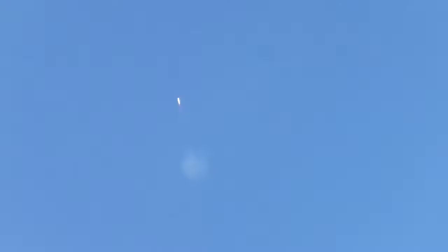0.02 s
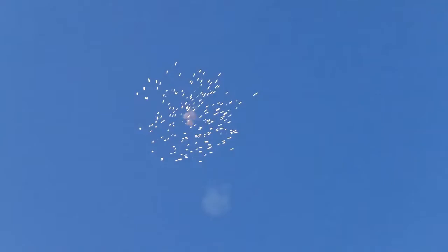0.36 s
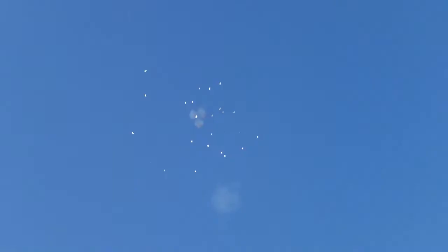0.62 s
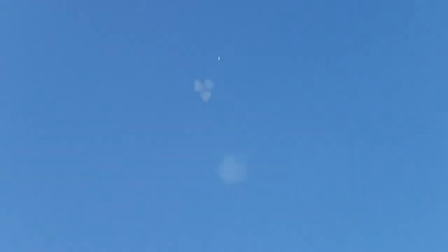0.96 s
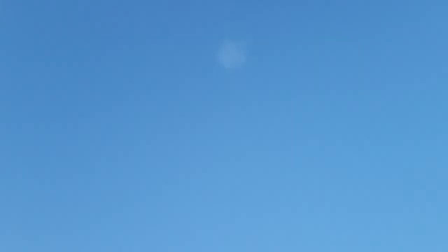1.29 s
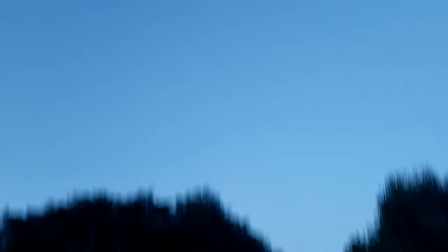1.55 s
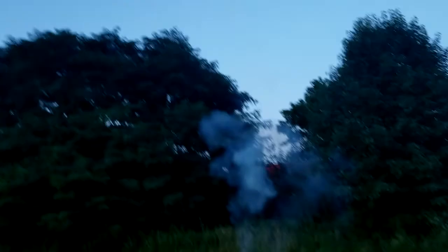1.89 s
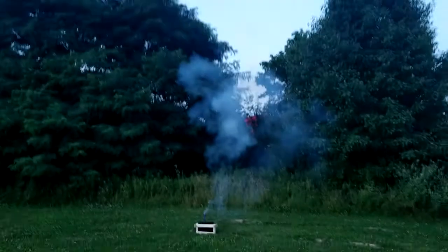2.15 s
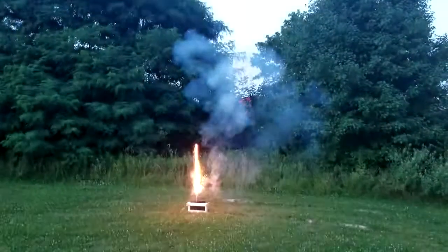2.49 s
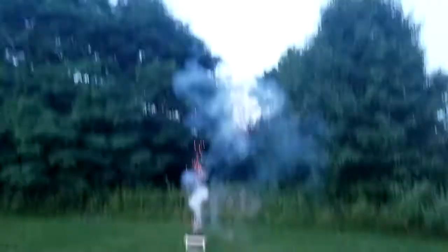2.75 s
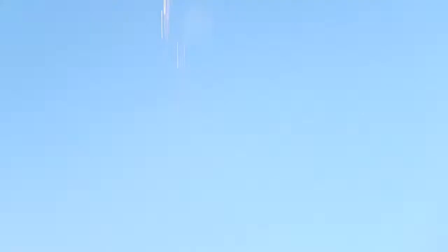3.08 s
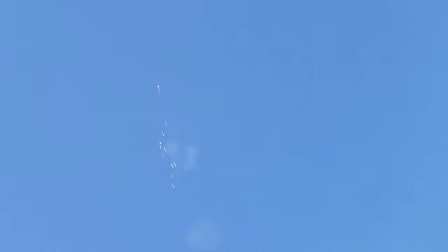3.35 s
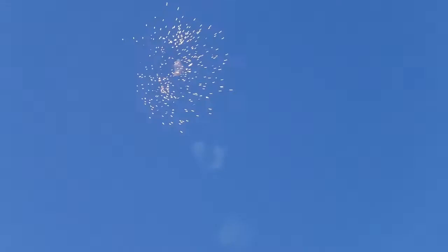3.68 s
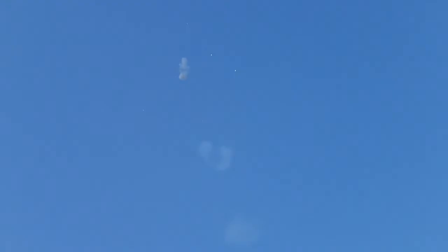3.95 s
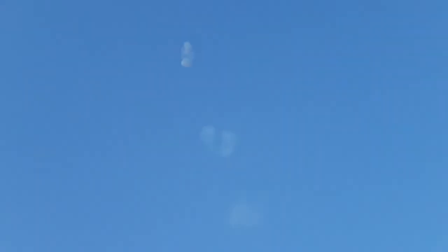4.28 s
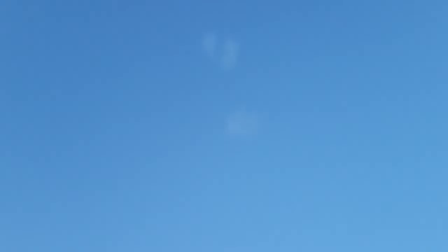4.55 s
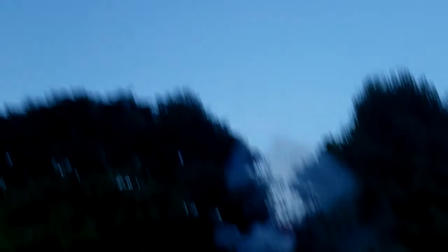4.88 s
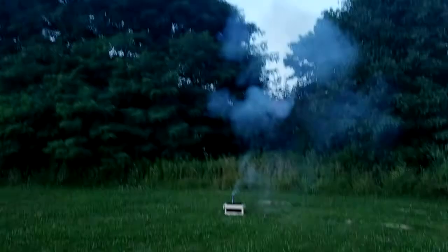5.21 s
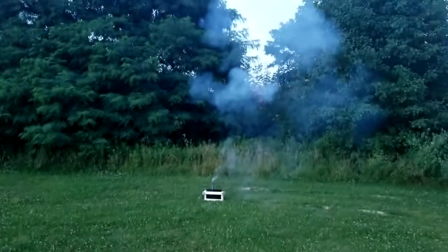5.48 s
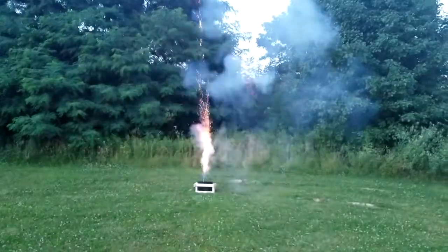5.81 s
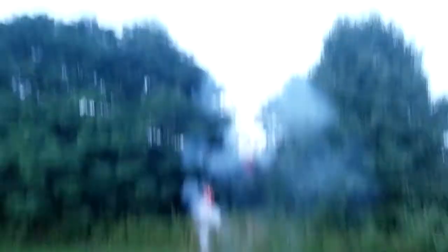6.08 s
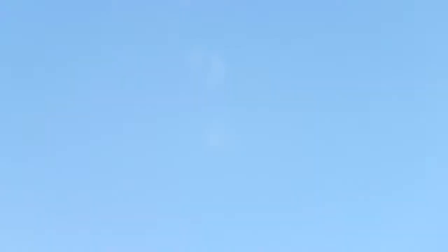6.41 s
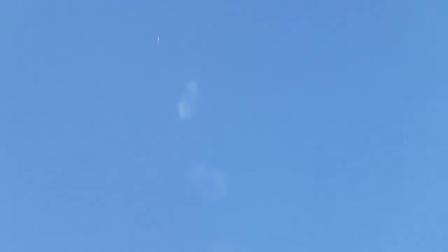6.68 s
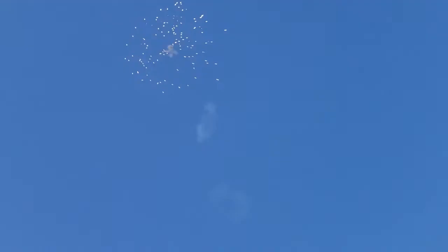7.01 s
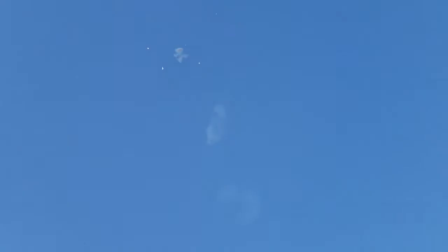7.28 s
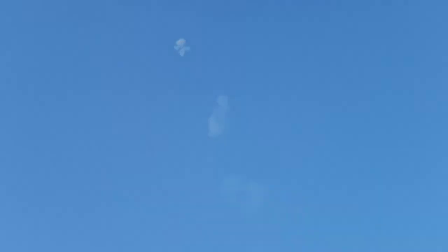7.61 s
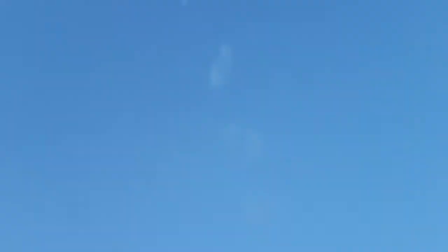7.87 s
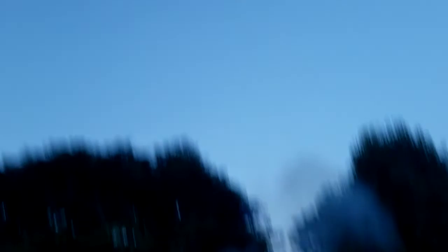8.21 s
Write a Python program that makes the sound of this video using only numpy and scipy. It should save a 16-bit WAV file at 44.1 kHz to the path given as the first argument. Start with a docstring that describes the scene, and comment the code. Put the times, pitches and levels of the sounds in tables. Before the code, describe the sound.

On a lawn ringed by trees, three loud firework bangs come about three seconds apart, the first right away. A hollow launch pop and a faint fizzing hiss lead into the second and third. Each bang distorts the microphone and leaves dull slapping echoes and a long, darkening roll. Underneath are a low, far-off engine hum, soft outdoor air, and occasional faint knocks and ticks.

```python
"""Firework shells burst one after another over a lawn ringed by trees, each bang overloading the mic.
A shell leaves its tube with a hollow pop and a short hiss, then fizzes upward on its fuse.
The near trees throw back a bright splash, far surfaces a dull slap and the woods a long roll.
Underneath, an engine hums far off in the dusk air, with dull knocks and the firework's faint ticks."""
import sys
import numpy as np
from scipy import signal
from scipy.fft import rfft, irfft
from scipy.io import wavfile

SR = 44100
rng = np.random.default_rng(int(sys.argv[2]) if len(sys.argv) > 2 else 0)


def waveform_to_disk(signal):
    """Save audio, clipped to [-1, 1], as 16-bit WAV at the path in sys.argv[1]."""
    frames = np.transpose(np.atleast_2d(signal))
    scaled = np.clip(frames, -1, 1) * 32767
    samples = np.round(scaled).astype(np.int16)
    wavfile.write(sys.argv[1], SR, samples)


N = 363825
TIME = np.arange(N) / SR


def from_db(db):
    """Decibels to gain."""
    return np.exp(np.asarray(db) * np.log(10) / 20)


def at_hz(points, hz):
    """Every column of a spectrum table, read at hz on a log frequency axis."""
    freqs, *columns = np.transpose(points)
    return [np.interp(np.log(hz), np.log(freqs), column) for column in columns]


def cut(x, hz, kind, order=2):
    """Causal Butterworth filter."""
    sos = signal.butter(order, np.clip(hz, 10, SR / 2 - 500), kind, fs=SR, output="sos")
    return signal.sosfilt(sos, x + 1e-18)


def drift(rate):
    """Random modulator that glides to a new unit-normal value rate times a second."""
    knots = rng.standard_normal(4096)
    return np.interp(TIME * rate, np.arange(len(knots)), knots)


def add(out, s, sound):
    """Mix a sound in at s seconds."""
    i = int(round(s * SR))
    out[i:i + len(sound)] += sound[:N - i]


def since(shots):
    """Age of the latest shot (10 s before the first) and that shot's columns, at every sample."""
    rows = np.array(shots)
    latest = np.searchsorted(rows[:, 0], TIME) - 1
    return np.where(latest < 0, 10, TIME - rows[latest, 0]), rows[latest].T


def noise_bands():
    """Half-octave bands of noise at rms 1, as (centre f/Hz, samples)."""
    edges = 31.25 * 2 ** np.arange(0, 9.1, .5)
    white = rng.standard_normal((2, N + SR // 2))
    for k, (low, high) in enumerate(zip(edges, edges[1:])):
        band = cut(white[k % 2], [low, high], "band")[-N:]
        yield np.sqrt(low * high), band / band.std()


def steady_noise(spectrum):
    """Noise through an EQ curve, at rms 1."""
    hz = np.maximum(np.arange(N // 2 + 1) * SR / N, 1)
    eq = from_db(at_hz(spectrum, hz)[0])
    noise = cut(irfft(rfft(rng.standard_normal(N)) * eq, N), 25, "high")
    return noise / noise.std()


# EQ of the evening air: f/Hz, relative level/dB
AIR_EQ = [(35, -1.5), (55, 6), (100, -1), (160, -5), (260, -11), (450, -7.5), (800, -16.5), (1500, -20),
          (1850, -27), (2250, -42), (3000, -36), (4000, -52.5), (4700, -41.5), (5800, -54.5), (7200, -51.5),
          (9000, -61), (12500, -66.5), (15000, -85.5)]


def air(level_db=-45):
    """Evening air lays a soft, dark bed under the scene."""
    return from_db(level_db) * steady_noise(AIR_EQ)


# fader ride of the far engine: t/s, level/dB
ENGINE_RIDE = [(0, -40), (1.2, -45), (2.2, -45.5), (2.9, -37.5), (3.4, -38.5), (4.6, -46), (5.4, -50.5),
               (6.4, -43.5), (8.25, -50.5)]
# partials of its hum: f/Hz, relative level/dB
ENGINE_PARTIALS = [(80, -4.5), (112, -3.5), (161.5, -17.5), (193.8, -14)]


def engine():
    """A few low partials waver on their way over the fields."""
    hum, speed = 0, 1 + .005 * drift(2.5)
    for hz, level_db in ENGINE_PARTIALS:
        phase = 2 * np.pi * np.cumsum(hz * speed) / SR
        hum = hum + np.sqrt(2) * from_db(level_db + 0.75 * drift(4.8)) * np.sin(phase)
    return hum * from_db(np.interp(TIME, *np.transpose(ENGINE_RIDE)))


# dull knocks: t/s, peak level/dB, f/Hz
DULL_KNOCKS = [(3.114, -34, 1080), (3.183, -25.5, 426), (3.198, -32, 433), (6.431, -35.5, 930),
               (6.496, -27, 416), (6.512, -29.5, 420)]
# small, bright ticks and spits from the smouldering firework: t/s, peak level/dB, f/Hz
FAINT_TICKS = [(1.178, -60, 10000), (1.27, -60, 11000), (1.525, -51, 4570), (2.828, -49, 8200),
               (4.843, -53, 4000), (6.19, -60, 12000), (8.01, -49, 4850), (8.2, -49, 4800)]


def taps(rows, t60, spread):
    """Each knock or tick is a brief puff of noise in a broad resonance."""
    out, t = np.zeros(N), TIME[:SR // 10]
    for s, level_db, hz in rows:
        puff = rng.standard_normal(len(t)) * from_db(-60 * t / t60)
        tap = cut(puff, [hz / (1 + spread), hz * (1 + spread)], "band", order=3)
        add(out, s, from_db(level_db) * tap / np.abs(tap).max())
    return out


# slapback off walls and tree lines: delay/s, peak level/dB, share of the shell's drift added to the delay
SLAPBACKS = [(0.03, -5.5, -0.026), (.103, -7.5, 1), (.279, -12, 1), (0.303, -12, -.25), (.54, -18, -1.5),
             (.647, -17.5, -.6)]


def far_echoes():
    """Each rough, distant surface slaps every bang back as a short, dull clump."""
    out, t = np.zeros(N), TIME[:SR // 6]
    for s, *_, drift_s in BURST_CUES:
        for delay_s, level_db, share in SLAPBACKS:
            facets = rng.standard_normal(len(t)) * np.exp(-t / .01)
            clump = cut(cut(facets, [260, 800], "band", order=1), 1500, "low")
            add(out, s + delay_s + share * drift_s, from_db(level_db) * clump / np.abs(clump).max())
    return out


def lawn_scatter(age, level_db, fade_db_per_s=451):
    """Envelope of the scatter off the grass: instant attack at age 0, fast decay."""
    return (age >= 0) * from_db(level_db - fade_db_per_s * np.clip(age, 0, 1))


# stands of trees, near to far: burst delay/s, burst level/dB, launch delay/s, launch level/dB
TREE_STANDS = [(0.042, 6, .036, 2.5), (.098, 5, 0.12, -12.5), (.24, -7.5, .27, -26),
               (.55, -20, .475, -34.5)]


def stand_scatter(age, columns, fade_db_per_s, swell_db_per_s=698, smear_s=0.21):
    """Envelope of the stands' returns: each swells and dies away, more slowly from deeper woods."""
    power = 0
    for delay_s, level_db in np.array(TREE_STANDS)[:, columns]:
        past_peak = (age - delay_s) / (1 + delay_s / smear_s)
        drop_db = np.maximum(-swell_db_per_s * past_peak, fade_db_per_s * past_peak)
        power = power + from_db(level_db - np.clip(drop_db, 0, 200)) ** 2
    return np.sqrt(power)


# EQ of the near splash, for a burst and for a launch: f/Hz, level/dB per half octave
BURST_SPLASH_EQ = [(40, -44), (85, -23), (180, -30), (400, -21.5), (700, -23), (900, -32), (1400, -19),
                   (2500, -28.5), (3700, -21), (6000, -29.5), (9000, -30), (14000, -31)]
LAUNCH_SPLASH_EQ = [(40, -33.5), (90, -61), (180, -42.5), (320, -41.5), (650, -42.5), (1400, -44.5),
                    (3300, -35.5), (5500, -35), (9000, -42), (14000, -44.5)]
# reverb tail of the woods, per half octave: f/Hz, burst level/dB, launch level/dB, t60/s
WOODS_ROLL = [(40, -37, -55, 0.82), (82, -37.5, -47, 4.8), (176, -28, -45.5, 2.73), (310, -25, -51, 2.92),
              (516, -19.5, -53, 3.21), (880, -30, -58, 2.93), (1314, -23, -36.5, 2.64),
              (2460, -29.5, -42, 1.72), (4000, -30, -45, 2.12), (7000, -24, -45, 0.97),
              (9000, -30.5, -52.5, 0.57), (14000, -37, -56, 1.8)]
FOLIAGE_LOSS_DB = 16   # at 10 kHz, one second after a burst


def trees():
    """Grass, leaves and trunks scatter every shot: a bright splash, then a roll that loses its treble."""
    burst_age, (_, _, bounce_s, burst_splash_db, burst_roll_db, _) = since(BURST_CUES)
    burst_stands = stand_scatter(burst_age, columns=[0, 1], fade_db_per_s=261.5)
    burst_lawn = lawn_scatter(burst_age - bounce_s, level_db=-1.5)
    burst_splash = np.hypot(burst_stands, burst_lawn) * from_db(burst_splash_db)
    burst_roll = np.minimum(burst_age / 0.046, 1) * from_db(burst_roll_db)

    launch_age, (_, _, launch_splash_db, launch_roll_db) = since(LAUNCH_CUES)
    launch_stands = stand_scatter(launch_age, columns=[2, 3], fade_db_per_s=312.5)
    launch_lawn = lawn_scatter(launch_age, level_db=-4.5)
    launch_splash = np.hypot(launch_stands, launch_lawn) * from_db(launch_splash_db)
    launch_roll = np.minimum(launch_age / 0.087, 1) * from_db(launch_roll_db)

    out, clumps = 0, drift(30)
    for hz, noise in noise_bands():
        burst_db, launch_db, t60 = at_hz(WOODS_ROLL, hz)
        # late returns have crossed so much foliage that their top is gone
        foliage_db = -FOLIAGE_LOSS_DB * (burst_age * hz / 10000) ** 2
        paths = [burst_splash * from_db(at_hz(BURST_SPLASH_EQ, hz)[0] + foliage_db),
                 launch_splash * from_db(at_hz(LAUNCH_SPLASH_EQ, hz)[0]),
                 burst_roll * from_db(burst_db + foliage_db - 60 * burst_age / t60),
                 launch_roll * from_db(launch_db - 60 * launch_age / t60)]
        envelope = np.sqrt(sum(path ** 2 for path in paths))   # unrelated paths add in power
        # a few big trunks make the low end lumpy, countless leaves keep the top smooth
        lumpy_db = .6 + 1 / (1 + hz / 1500)
        out = out + noise * envelope * from_db(lumpy_db * (clumps + 0.42 * drift(60)))
    return out


# EQ of the burning fuse: f/Hz, relative level/dB
FUSE_EQ = [(60, 0.5), (180, 3.5), (280, 0), (450, -4), (800, -9.5), (1600, -14), (2400, -31.5),
           (3300, -34.5), (5200, -29.5), (8500, -39), (13000, -40.5), (15500, -44.5)]
FUSE_DB, FUSE_FLARE_S, FUSE_FADE_DB_PER_S = -43.5, .28, 6.5


def fuses(head_start_s=0.75):
    """A fuse flares, sputters and fades as it climbs to the burst; the first shell starts aloft."""
    flight_s = np.where(TIME < BURST_CUES[0][0], TIME + head_start_s, since(LAUNCH_CUES)[0])
    burning = flight_s < since(BURST_CUES)[0]
    envelope = np.minimum(flight_s / FUSE_FLARE_S, 1) * from_db(FUSE_DB - FUSE_FADE_DB_PER_S * flight_s)
    sputter = from_db(1.6 * drift(45) + 1.2 * drift(21))
    return burning * envelope * sputter * steady_noise(FUSE_EQ)


# hiss after each launch, a band near 5.6 kHz and a faint, thin one near 13 kHz:
# f/Hz, half width/Hz, level/dB
HISS_BANDS = [(5600, 1400, -56.5), (13400, 900, -71)]


def launch_hiss(hold_s=0.31, fade_db_per_s=67):
    """A flickering hiss follows each launch, holds and dies down."""
    hiss = 0
    for hz, half_width_hz, level_db in HISS_BANDS:
        band = cut(rng.standard_normal(N), [hz - half_width_hz, hz + half_width_hz], "band")
        hiss = hiss + from_db(level_db) * band / band.std()
    release_s = np.clip(since(LAUNCH_CUES)[0] - hold_s, 0, 3)
    return hiss * from_db(2.3 * drift(15) - fade_db_per_s * release_s)


def blast(push_s, suck_s, decay_s):
    """Pressure pulse of a charge: a shock front, a suction phase, then a slow swing back."""
    t = TIME[:SR // 16]
    return -(1 - t / push_s) * (1 - t / (push_s + suck_s)) * np.exp(-t / decay_s)


# launch cues: t/s, pop gain/dB, splash send/dB, roll send/dB
LAUNCH_CUES = [(2.354, -10, 4.5, -3), (5.5827, -10, 5.5, -2.5)]
# ring of the tube and its box: f/Hz, relative level/dB, t60/s
TUBE_MODES = [(71, -31, 0.085), (123.5, -3, 0.035), (163, -5.5, .055), (215, 4.5, 0.035),
              (280, -3.5, 0.045), (523, -3.5, 0.019), (840, 0.5, 0.014), (1316, 17, 0.0083),
              (1548, -14, 0.068), (3227, 11.5, 0.0057), (4740, 7, 0.007)]
# early reflections off near trunks: delay/s, level/dB
TRUNK_ECHOES = [(0.0107, -18), (.024, -27), (.037, -19.5)]


def launches(wall_delay_s=.0872):
    """The lift charge cracks and rings the tube; trunks return it faintly, a wall adds a duller copy."""
    out, t = np.zeros(N), TIME[:SR // 8]
    for s, level_db, _, _ in LAUNCH_CUES:
        add(out, s, from_db(level_db + 3) * blast(push_s=0.0026, suck_s=0.0061, decay_s=0.0017))
        for hz, mode_db, t60 in TUBE_MODES:
            pitch = hz * (1 + .02 * rng.standard_normal())
            add(out, s, from_db(level_db + mode_db - 60 * t / t60) * np.sin(2 * np.pi * pitch * t))
    wall_echo = from_db(-10.5) * cut(out, 540, "low", order=1)
    dulled_pops = cut(out, 2500, "low")
    for delay_s, level_db in TRUNK_ECHOES:
        add(out, delay_s, from_db(level_db) * dulled_pops)
    add(out, wall_delay_s, cut(wall_echo, 5000, "low"))
    return out


# burst cues: t/s, level/dB before overload, ground bounce delay/s, splash send/dB, roll send/dB,
# drift/s (the shell's distance off the line of fire, as sound travel time)
BURST_CUES = [(0.139, 36, 0.012, -2, 1.5, -0.015), (3.4645, 34, 0.011, -3, 1, 0.019),
              (6.7659, 27.5, 0.012, -4.5, 1, 0)]


def bursts():
    """Each shell's blast hits straight from the sky, then again, softer and darker, off the lawn."""
    out = np.zeros(N)
    direct = blast(push_s=.00045, suck_s=0.001, decay_s=.0015)
    bounce = cut(blast(push_s=0.00049, suck_s=0.0022, decay_s=0.001), 2500, "low", order=1)
    for s, level_db, bounce_s, *_ in BURST_CUES:
        add(out, s, from_db(level_db) * direct)
        add(out, s + bounce_s, from_db(level_db - 9.5) * bounce)
    return out


def scene():
    """The firework, its echoes, the knocks and ticks and the bed, mixed to dual mono."""
    firework = bursts() + launches() + launch_hiss() + fuses()
    small = taps(DULL_KNOCKS, t60=0.019, spread=0.37) + taps(FAINT_TICKS, t60=.04, spread=0.2)
    bed = air() + engine()
    mix = firework + trees() + far_echoes() + small + bed
    return np.array([mix, mix])


CLIP_LEVEL, PAN_DB, CUTOFF_HZ = 0.65, 1.57, 15750


def record(dry):
    """The mic saturates and its bass cuts make the flat tops droop; panned a little right, top cut off."""
    clipped = dry / (1 + (dry / CLIP_LEVEL) ** 4) ** .25
    drooping = cut(cut(clipped, 30, "high"), 40, "high", order=3)
    panned = drooping * from_db([[-PAN_DB], [PAN_DB]])
    return signal.sosfilt(signal.ellip(10, .1, 80, CUTOFF_HZ, fs=SR, output="sos"), panned)


dry = scene()
out = record(dry)
waveform_to_disk(out)
```